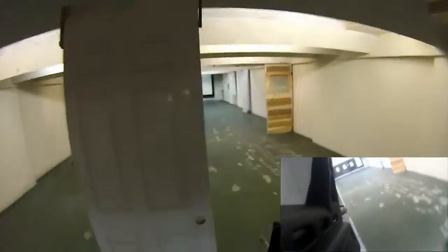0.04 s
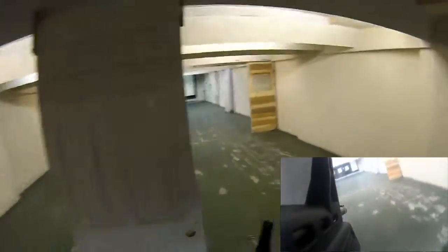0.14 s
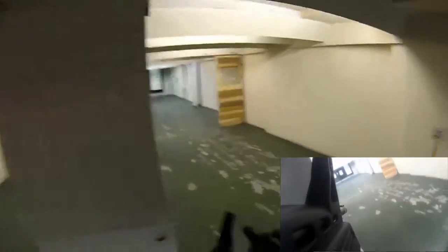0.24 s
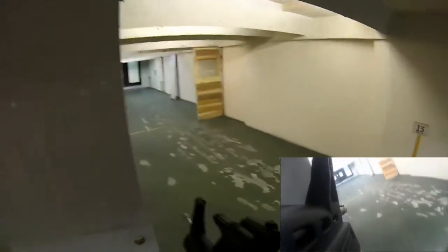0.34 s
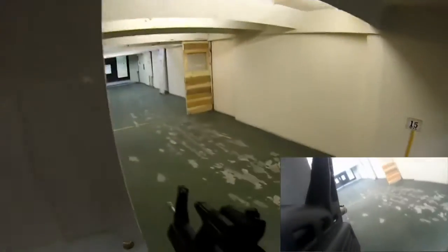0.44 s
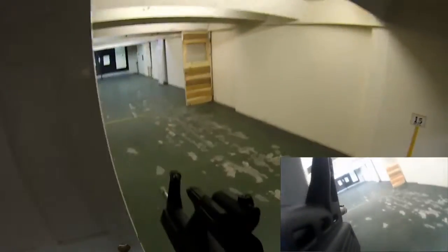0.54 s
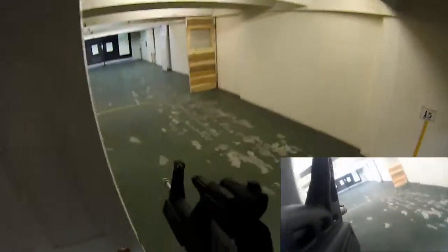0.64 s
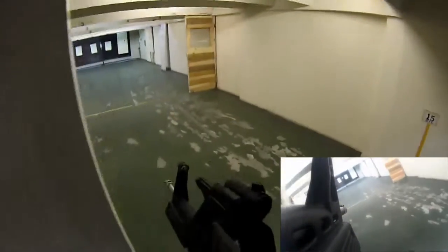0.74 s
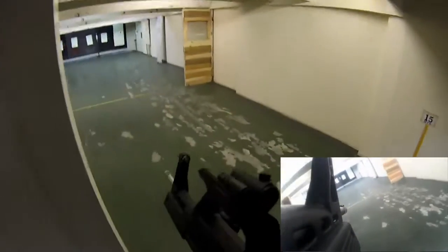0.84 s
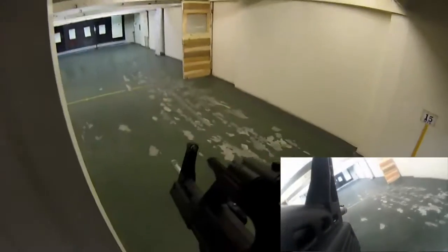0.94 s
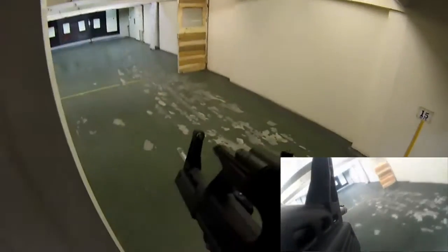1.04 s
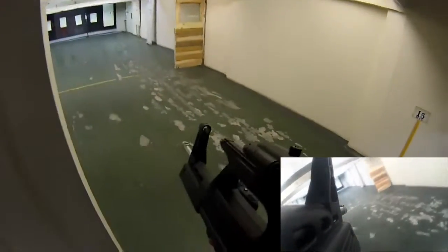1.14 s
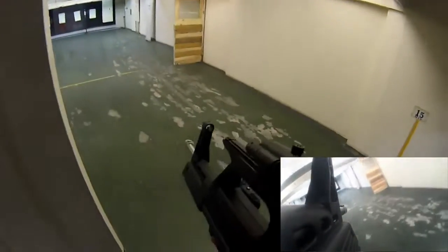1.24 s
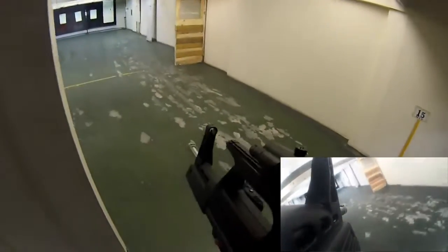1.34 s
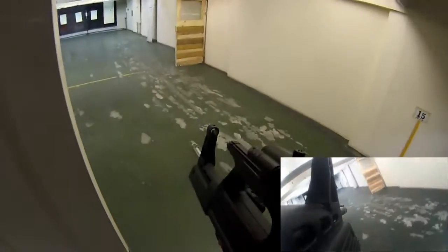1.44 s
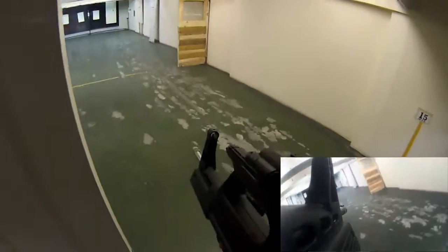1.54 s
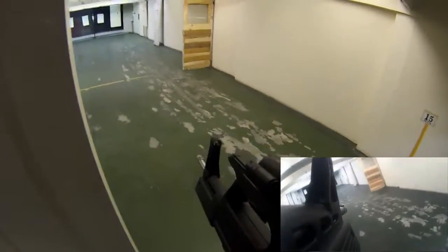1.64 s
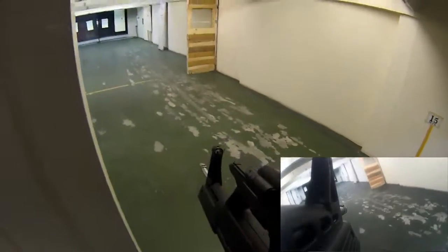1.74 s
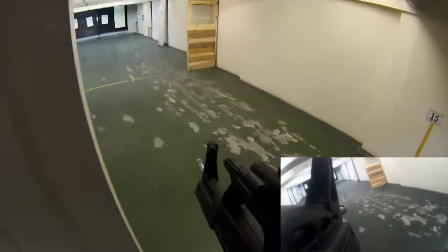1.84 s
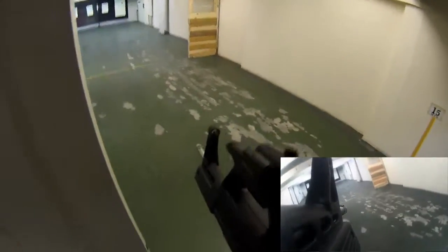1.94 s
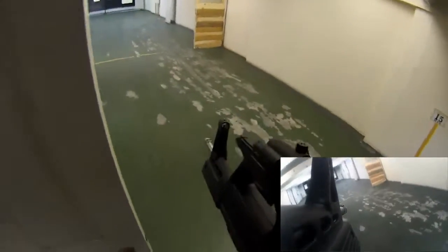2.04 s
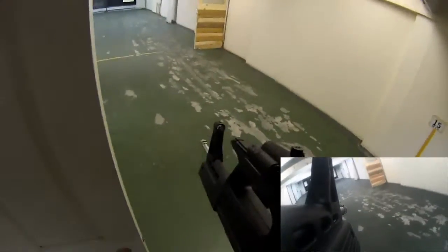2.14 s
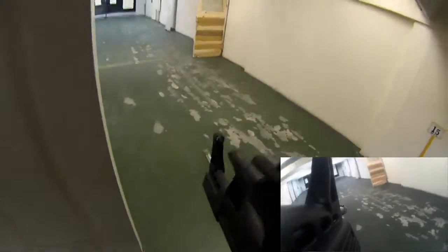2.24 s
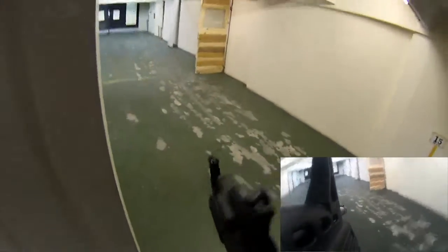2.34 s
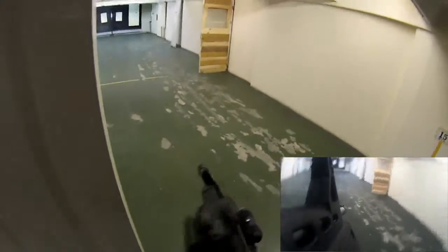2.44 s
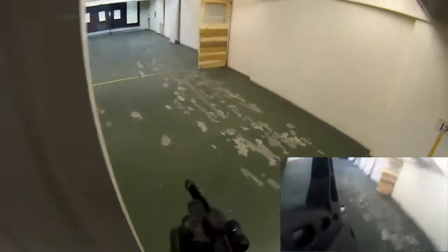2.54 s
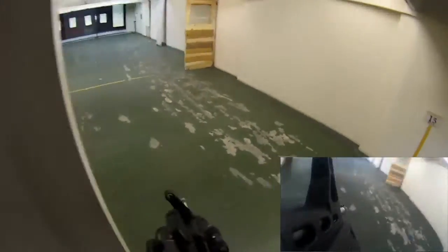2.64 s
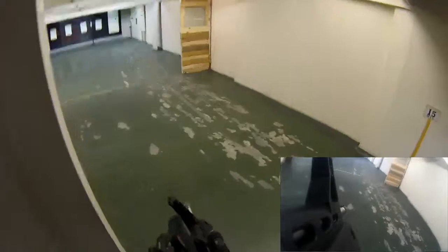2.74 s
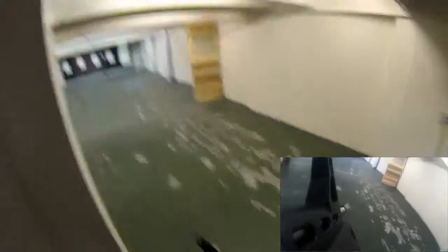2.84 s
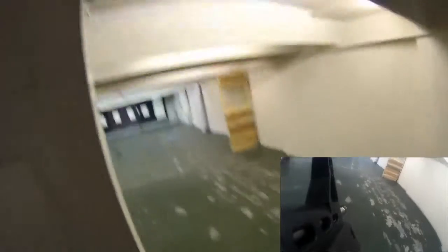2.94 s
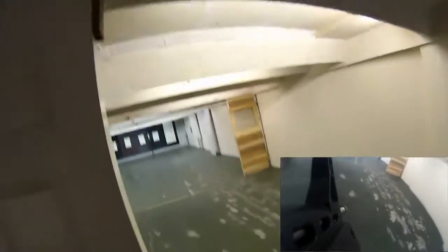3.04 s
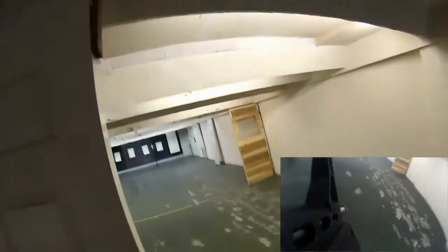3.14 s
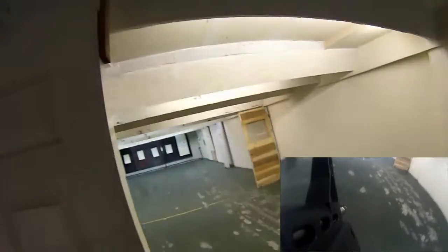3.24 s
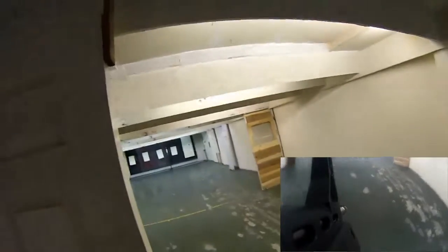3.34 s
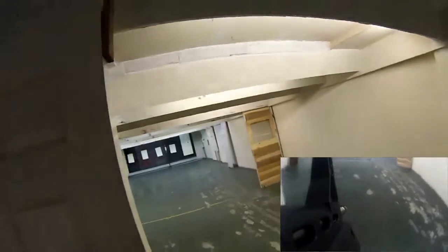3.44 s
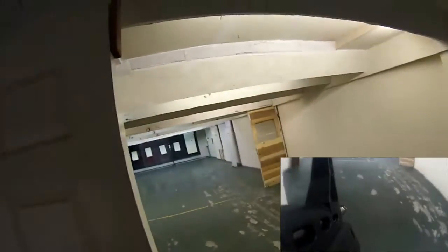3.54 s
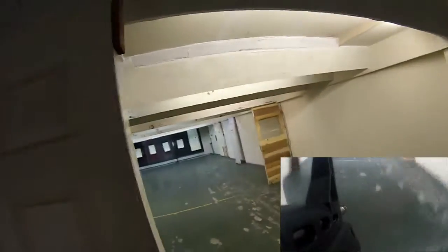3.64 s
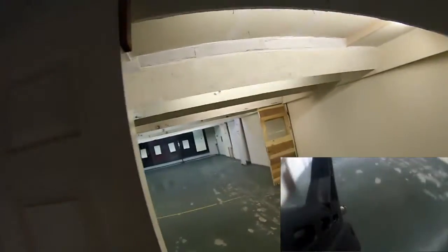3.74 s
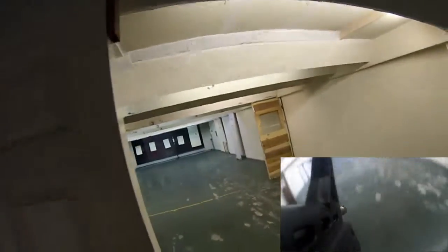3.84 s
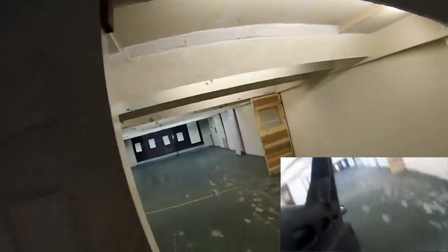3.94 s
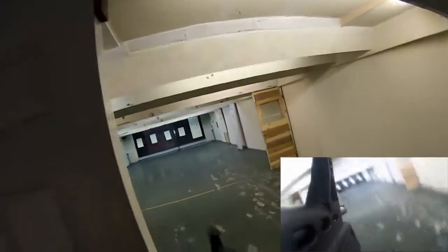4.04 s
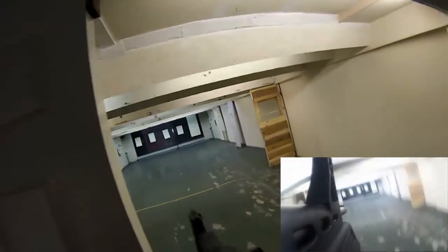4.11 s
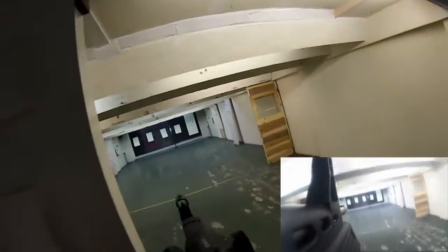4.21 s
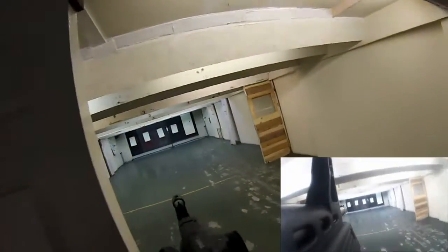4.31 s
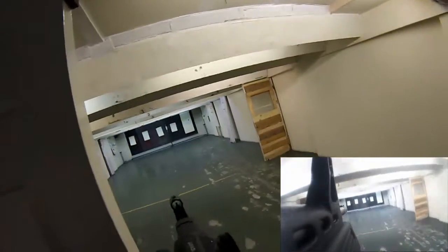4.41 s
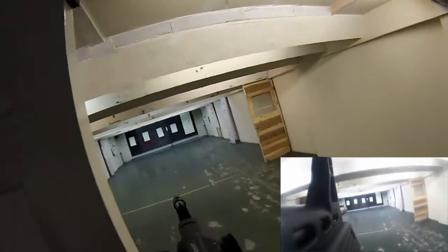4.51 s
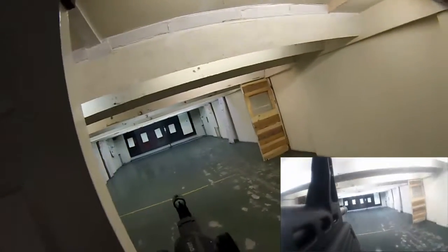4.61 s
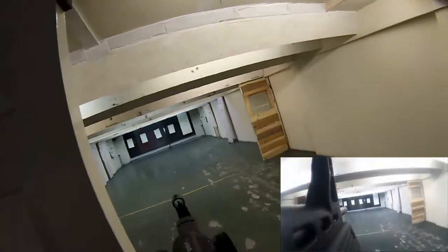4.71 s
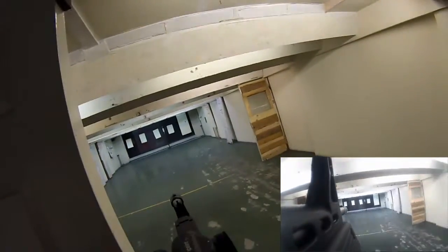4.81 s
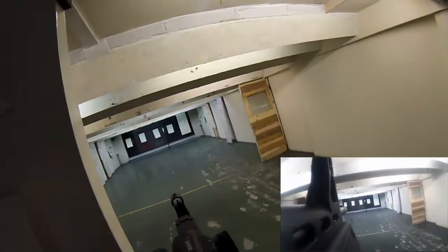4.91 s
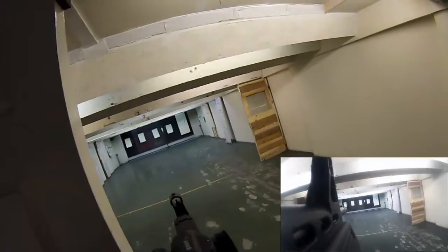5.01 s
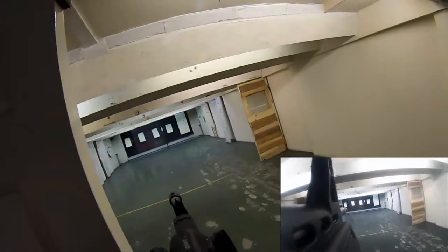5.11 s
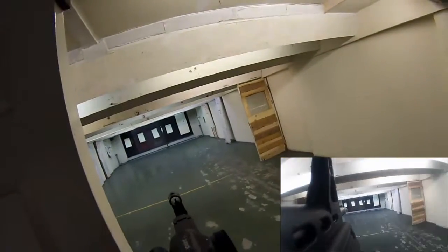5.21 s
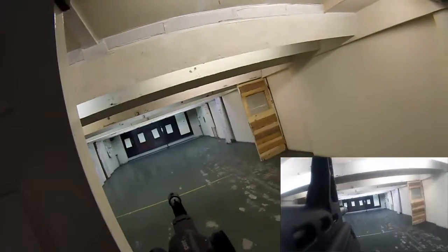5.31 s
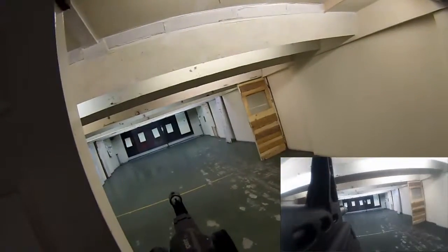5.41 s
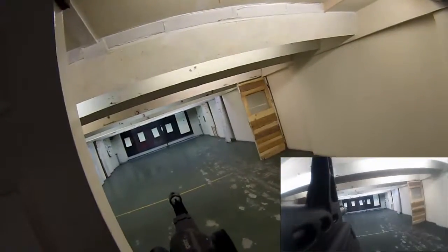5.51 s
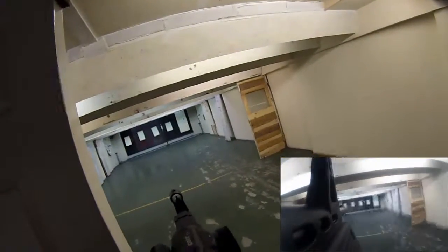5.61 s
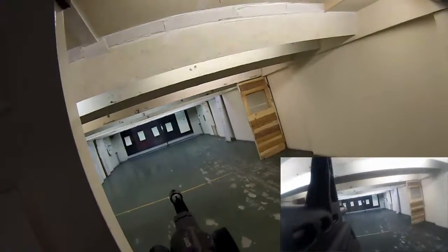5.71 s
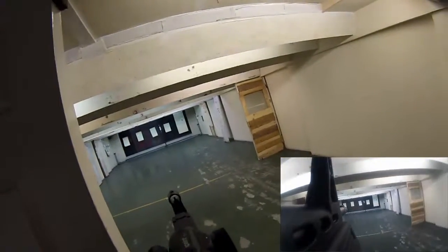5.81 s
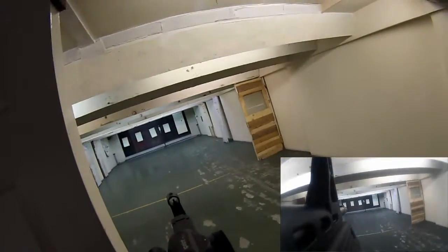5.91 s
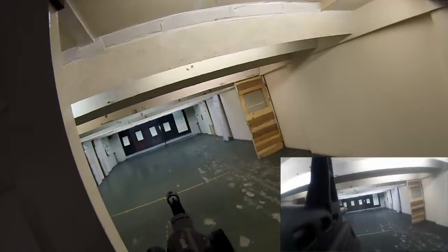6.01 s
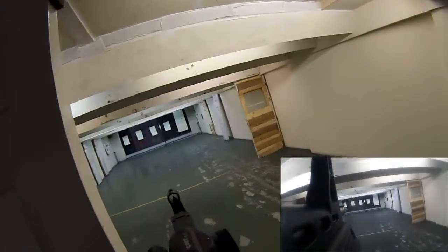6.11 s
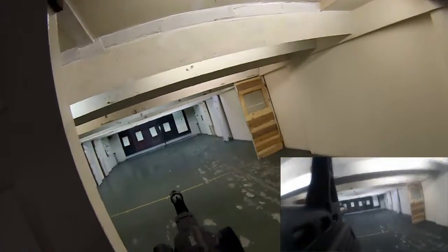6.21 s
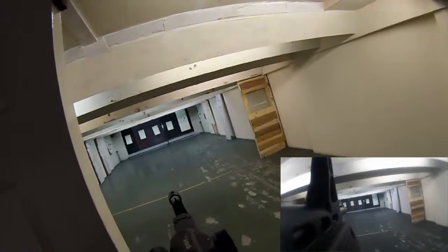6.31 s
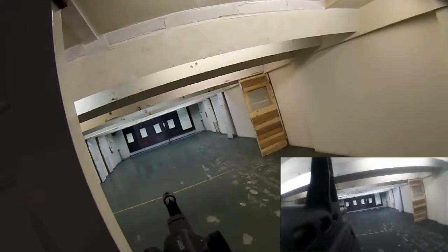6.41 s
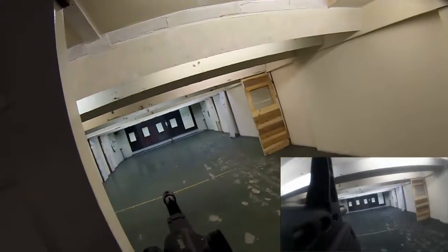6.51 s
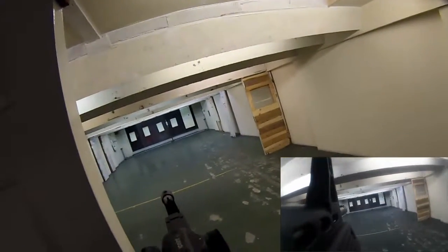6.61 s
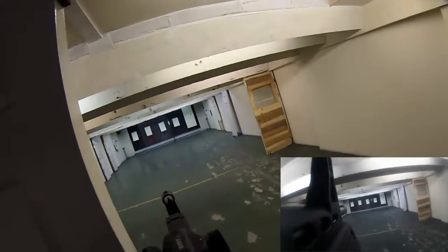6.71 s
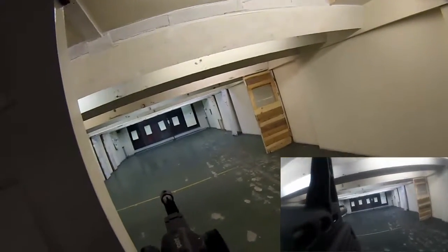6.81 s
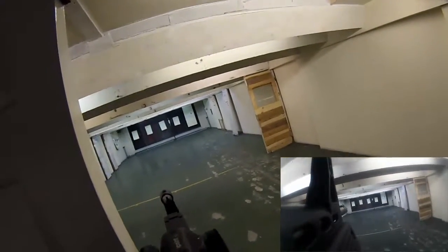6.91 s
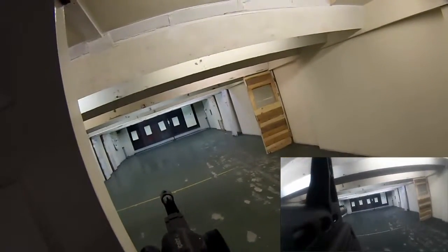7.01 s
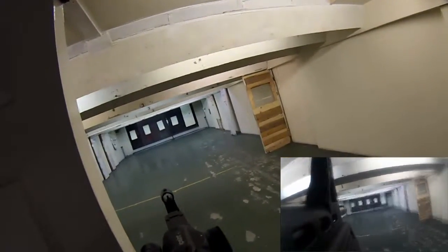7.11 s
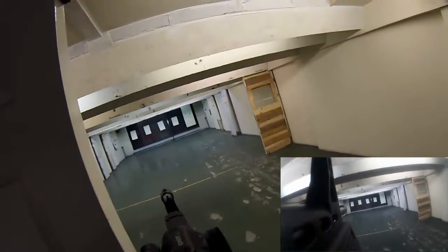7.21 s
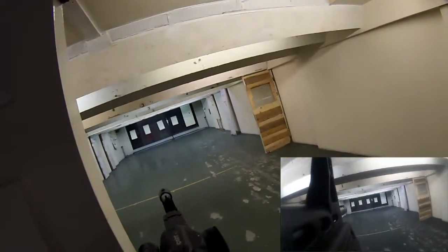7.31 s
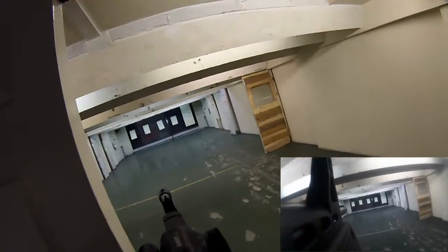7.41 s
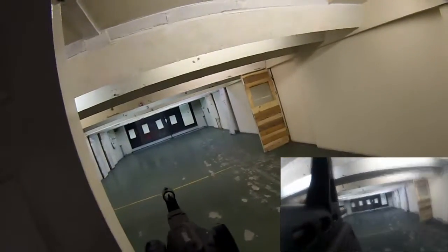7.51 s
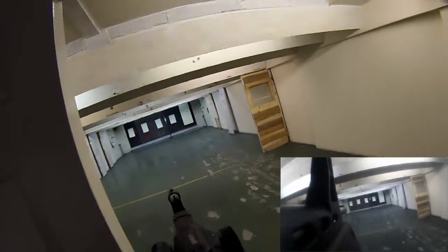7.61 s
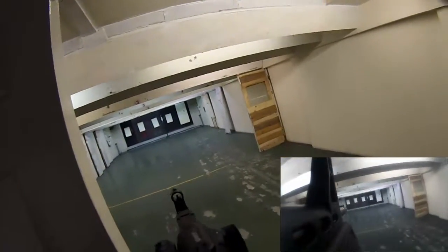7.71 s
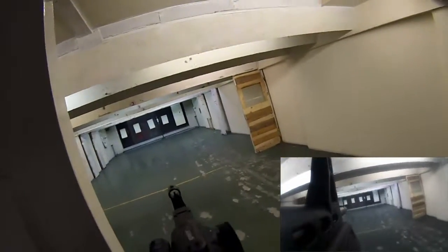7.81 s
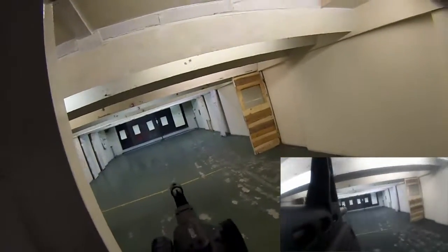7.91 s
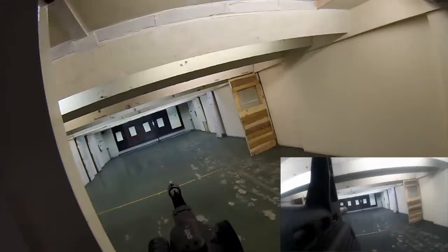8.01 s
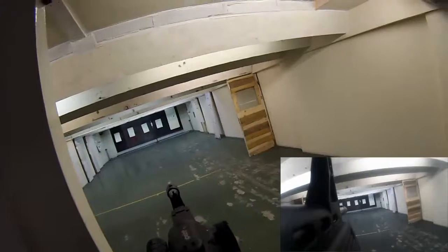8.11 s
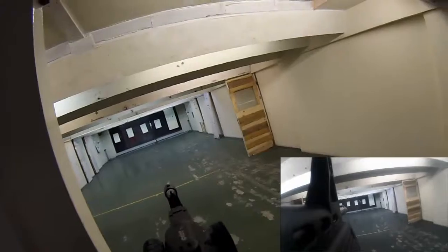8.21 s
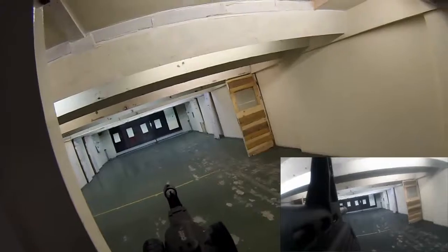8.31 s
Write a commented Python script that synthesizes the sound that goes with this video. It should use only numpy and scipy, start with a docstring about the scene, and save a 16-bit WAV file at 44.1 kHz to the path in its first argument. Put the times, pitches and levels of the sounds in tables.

```python
"""A rifle is handled, loaded and fired four times in a concrete indoor range, heard at a camera on the shooter.
From the start, filtered noise and a sine give steady ventilation, while grains and low noise give gear rustle.
Damped tones, noise contacts and random metal modes give knocks and clicks; at 3.7 s the bolt's steel modes ring.
The rustle dies away; from 5.65 s each blast is a set of shock arrivals, a far-wall slap and a diffuse roar.
Throughout, a gain control holds down loud passages; cracks that remain too strong are clipped."""
import sys
import numpy as np
from scipy import signal
from scipy.io import wavfile
from scipy.ndimage import uniform_filter1d

SR = 44100
rng = np.random.default_rng(int(sys.argv[2]) if len(sys.argv) > 2 else 0)


def materialize(psi):
    """Save the field psi as 16-bit PCM at rate SR to the path in sys.argv[1].

    A 1-D psi becomes a single channel; in a 2-D psi each row is a channel.
    """
    bounded = np.clip(np.atleast_2d(psi).T, -1, 1)
    quanta = np.round(bounded * 32767).astype(np.int16)
    wavfile.write(sys.argv[1], SR, quanta)


N = 368235
TIME = np.arange(N) / SR

# All levels in the tables are relative; the sources add their own offsets.
# Ventilation spectrum: f/Hz, density level/dB
AIR_SPECTRUM = [(15, -14), (28, -7), (65, -16.5), (100, -7.5), (150, -18.5), (200, -13.5), (270, -16.5),
                (400, -14.5), (480, -19), (720, -20), (1300, -23), (5000, -32), (14000, -41)]
# Effort of the shooter's movement, for rustle and rumble: t/s, level/dB
MOVEMENT_EFFORT = [(0.0, -46), (0.18, -48.5), (0.43, -53), (0.75, -46.5), (0.9, -57.5), (1.08, -53.5),
                   (1.29, -54), (1.72, -62), (1.94, -55), (2.11, -48.5), (2.21, -50.5), (2.33, -56),
                   (2.62, -61.5), (3.24, -59), (3.3, -54)]
# Jostles of the camera: t/s, level/dB
CAMERA_BUMPS = [(.02, -44.5), (.6, -50)]
# Knocks of rifle, magazine and sling: t/s, hollow knock level/dB, hollow pitch f/Hz,
# metal clack level/dB, bright tick level/dB, lead of the first light touch t/s
KNOCKS = [(0.201, -6.5, 740, -29, -35, .021), (0.258, -22, 930, -49, -62, 0.013),
          (0.334, -12, 663, -44, -45.5, 0.0011), (0.39, -28, 880, -46, -49.5, .001),
          (0.505, -24, 567, -62, -73, 0.00076), (0.69, -22, 560, -50.5, -61, 0.0023),
          (0.882, -29, 860, -46.5, -56.5, 0.0036), (0.963, -24.5, 900, -50.5, -55.5, 0.0024),
          (1.037, -32, 740, -56, -62, .002), (1.172, -25.5, 635, -42.5, -56, 0.0012),
          (1.288, -18, 574, -43, -50.5, 0.023), (1.635, -16, 647, -44, -51.5, 0.0011),
          (1.885, -27, 716, -52, -58, .004), (1.985, -15.5, 575, -42.5, -52, 0.02),
          (2.108, -18, 520, -47.5, -49.5, 0.015), (2.125, -22, 594, -46, -53, 0.0029),
          (2.2243, -13, 800, -28, -32, 0.0088), (2.272, -15.5, 634, -37.5, -42, .004),
          (2.5608, -12, 620, -28, -30.5, .001), (2.572, -14.5, 1020, -27.5, -30, .004),
          (2.883, -24.5, 950, -54, -57, 0.0019), (3.129, -23, 840, -49, -60, .007),
          (3.362, -10.5, 935, -24, -33, 0.0013), (3.393, 2, 930, -15.5, -23, 0.0029),
          (3.6984, 1.5, 920, -13, -12.5, .005), (4.609, -33, 905, -54.5, -68, 0.00096),
          (4.648, -42.5, 692, -76, -71, .002), (4.7, -42.5, 870, -66, -70, .002),
          (4.816, -44, 620, -69, -76, .002), (5.39, -42, 894, -63, -74, 0.0013),
          (5.501, -36.5, 900, -73, -77, 0.00082), (5.643, -18.5, 940, -46, -46, 0.031)]
# Spectrum of the hollow knock: f/Hz, density level/dB
HOLLOW_SPECTRUM = [(100, -40), (330, -21.5), (430, -8.5), (520, 0), (650, 1), (780, -5), (950, -0.5),
                   (1300, -12), (2500, -41.5), (6000, -75.5)]
# Spectrum of the metal clack: f/Hz, density level/dB
CLACK_SPECTRUM = [(400, -27), (1400, -5.5), (1900, 5), (2400, 4), (3100, 0.5), (3600, 2), (4600, -10),
                  (7000, -31.5), (14000, -50.5)]
# Spectrum of the bright tick: f/Hz, density level/dB
TICK_SPECTRUM = [(1000, -49.5), (3500, -7), (5000, 3.5), (7000, 3), (9500, -8), (14000, -13.5)]
# Reverberation of the hall, before any shortening: f/Hz, 60 dB decay time t/s
HALL_DECAY = [(60, 0.69), (250, 0.92), (800, 1.48), (2000, 1.37), (4000, 1.317), (8000, 0.96), (14000, 1.1)]
# Spectrum of the hall's answer to a hollow knock: f/Hz, density level/dB
KNOCK_ECHO_SPECTRUM = [(100, -35.5), (350, -28), (520, -8), (650, -3.5), (780, -1), (940, -0.5),
                       (1200, -10.5), (2500, -19.5), (6000, -66)]
# Spectrum of the hall's answer to a metal clack: f/Hz, density level/dB
CLACK_ECHO_SPECTRUM = [(500, -19), (1400, -11.5), (2200, 1), (3100, -2.5), (4600, -0.5), (5500, -2),
                       (7000, -11.5), (14000, -49)]
# The bolt slams home, a single row: t/s, level/dB
BOLT_SLAM = (3.6995, 11)
# Steel modes of the bolt: f/Hz, bandwidth f/Hz, energy level/dB
STEEL_MODES = [(2150, 81, -11), (2570, 100, -14), (3440, 131.4, -11.5), (4430, 58, 1.5), (5050, 130, -9.5),
               (5230, 240, 6.5), (6400, 220, -7.5)]
# Shots: t/s, blast level/dB, recoil thump level/dB
SHOTS = [(5.6507, -5, -20), (6.2206, -6, -22), (7.1482, -4, -9), (7.5300, -4.5, -14.5)]
# Blast paths, from the gun itself to the near walls: delay t/s, ring level/dB, ring f/Hz,
# shock front level/dB, spray level/dB, scatter time t/s, polarity of the front (sign)
BLAST_PATHS = [(-.0022, -17, 2520, -3, -11.5, 0.0022, 1), (-.0002, -1, 1010, -4.5, 9.5, 0.0006, 1),
               (.0037, 0, 3330, -19, -7.5, 0.0013, 1), (.0078, 10.5, 2127, 4.5, 5.5, 0.0018, -1),
               (0.0148, -9, 1120, -40, -13, 0.00078, 1), (0.0281, -4, 940, -52, -11.5, 0.011, -1)]
# Spectrum of the crack: f/Hz, density level/dB
CRACK_SPECTRUM = [(40, 0.5), (200, -2.5), (700, 2), (2000, -1.5), (3400, -2), (5000, -6), (6800, -7.5),
                  (8500, -17.5), (14000, -20)]
# Spectrum of the far wall's slap: f/Hz, density level/dB
SLAP_SPECTRUM = [(100, -19), (400, -12.5), (750, 8), (1200, -5.5), (2000, 3.5), (2700, -5.5), (4000, -17),
                 (14000, -32.5)]
# Spectrum of the roar that follows: f/Hz, density level/dB
ROAR_SPECTRUM = [(40, -22.5), (100, -14.5), (170, -13), (290, -12), (450, -7), (730, 0), (1050, -1.5),
                 (1350, -7), (1850, -0.5), (2300, -4), (2750, -11.5), (3250, -6), (3900, -15.5),
                 (5200, -15), (14000, -35.5)]

AIR_DB = -62  # rms level of the air noise
RUN_UP_S = 0.035  # time given to the touch and slide before each knock
# A heavier blow rings longer: rise time doubles with every RING_DOUBLING_DB above the usual knock.
USUAL_KNOCK_DB, RING_DOUBLING_DB = -20, 41.5
BLAST_RING_S = 0.0005  # rise time
EDGE_HZ = 14250  # upper band limit


def amp(db):
    """Level definition: an amplitude ratio is 10 to the power dB/20."""
    return 10 ** (np.asarray(db) / 20)


def evened(x):
    """Normalization: division by the root mean square gives unit rms."""
    return x / np.sqrt(np.mean(x ** 2) + 1e-20)


def read(points, hz):
    """Interpolation on a logarithmic frequency axis."""
    f, value = np.transpose(points)
    return np.interp(np.log(hz + 1), np.log(f + 1), value)


def add(mix, s, sound):
    """Superposition: a sound is summed into the mix from time s."""
    part = mix[max(round(s * SR), 0):][:len(sound)]
    part += sound[:len(part)]


def colour(x, spectrum, size=4096):
    """Minimum-phase filtering: the log gain fixes the phase of a causal filter, here of unit energy."""
    hz = abs(np.fft.fftfreq(size, 1 / SR))
    log_gain = np.log(amp(read(spectrum, hz)))
    response = np.exp(np.conj(signal.hilbert(log_gain)))
    taps = np.fft.ifft(response).real[:size // 2]
    return signal.oaconvolve(x, taps / np.linalg.norm(taps))[:len(x)]


def ring(hz, rise_s, size=4000):
    """Critically damped envelope: a tone swells to its peak at rise_s and dies."""
    t = TIME[:size]
    return np.sin(2 * np.pi * hz * t) * t / rise_s * np.exp(1 - t / rise_s)


def ventilation(hum_hz=100, hum_db=-73):
    """Stationary noise: steady coloured air flow with a faint sinusoidal mains hum."""
    air = evened(colour(rng.standard_normal(N), AIR_SPECTRUM))
    return amp(AIR_DB) * air + amp(hum_db) * np.sin(2 * np.pi * hum_hz * TIME)


def effort(s, settle_db_per_s=14):
    """Exponential decay: after its last row the level of movement falls steadily as the aim steadies."""
    at, db = np.transpose(MOVEMENT_EFFORT)
    return np.interp(s, at, db) - settle_db_per_s * np.maximum(s - at[-1], 0)


def movement(rustle_db=1.0, scrape_db=-12, rumble_db=-1, grains_per_s=1600, grain_db=-2.5,
             fits_db=3, fit_s=0.023):
    """Friction as random impulses: cloth and sling rub in fits of grains while the camera rumbles."""
    struck = rng.random(N) < grains_per_s / SR
    strength = amp(grain_db * np.minimum(rng.exponential(1, N), 3))
    fits = evened(uniform_filter1d(rng.standard_normal(N), int(fit_s * SR)))
    grains = struck * rng.standard_normal(N) * strength * amp(fits_db * fits)
    rustle = evened(colour(grains, HOLLOW_SPECTRUM))
    scrape = evened(colour(grains, CLACK_SPECTRUM) + colour(grains, TICK_SPECTRUM) / 2)
    # rumble spectrum: f/Hz, density level/dB
    low = [(15, -12.5), (50, -5), (100, -7.0), (200, -3), (400, 0.0), (2000, -61)]
    rumble = evened(colour(rng.standard_normal(N), low))
    return amp(effort(TIME)) * (amp(rustle_db) * rustle + amp(scrape_db) * scrape + amp(rumble_db) * rumble)


def bumps(hz=52, rise_s=0.025, size=12000):
    """Damped oscillation: each jostle of the camera gives a soft, deep throb."""
    out = np.zeros(N)
    for s, db in CAMERA_BUMPS:
        add(out, s, amp(db) * ring(hz, rise_s, size=size))
    return out


def hall(build_s, flutter_db, shorter=1, size=70000):
    """Diffuse reverberation: echo density builds up in clusters and each band decays at its own rate."""
    hz, t, z = signal.stft(rng.standard_normal(size), SR, nperseg=256)
    clusters = evened(uniform_filter1d(rng.standard_normal(len(t)), size=3))
    decay_s = shorter * read(HALL_DECAY, hz)[:, None]
    z = z * amp(flutter_db * clusters - 60 * t / decay_s)
    tail = signal.istft(z, SR, nperseg=256)[1][:size]
    tail = tail * (1 - np.exp(-TIME[:size] / build_s))
    return tail / np.linalg.norm(tail)


def near_hall(early_db=6, early_s=0.035, build_s=0.0063, flutter_db=1.3, shorter=0.7):
    """Early reflection: near walls strengthen the first echoes of small sounds at the shooter."""
    tail = hall(build_s, flutter_db, shorter)
    tail = tail * (1 + amp(early_db) * np.exp(-TIME[:len(tail)] / early_s))
    return tail / np.linalg.norm(tail)


def rattles(level_db=-33, spread_db=2, low_hz=560, high_hz=820, metal_db=-60, tick_db=-62,
            lead_s=0.003, count=10):
    """Random excitation: loose gear taps faintly, once in each equal interval; rows as in KNOCKS."""
    when, strength, pitch = rng.random((count, 3)).T
    s = (np.arange(count) + when) / count * MOVEMENT_EFFORT[-1][0]
    db = spread_db * (2 * strength - 1)
    hz = low_hz + (high_hz - low_hz) * pitch
    return list(zip(s, db + level_db, hz, db + metal_db, db + tick_db, np.full(count, lead_s)))


def pitched(spectrum, hz, usual_hz=760, follow=0.26):
    """Spectral scaling: a knock's colour shifts part of the way with its pitch."""
    return [(f * (hz / usual_hz) ** follow, db) for f, db in spectrum]


def contact(decay_s, lead_s, touch_db, slide_db, slide_s, rise_s, size=7000):
    """Contact noise: rough parts touch lightly, slide, meet after RUN_UP_S and rattle out."""
    t = TIME[:size] - RUN_UP_S
    touch, meet = [(1 - np.exp(-after / rise_s)) * np.exp(-after / decay_s)
                   for after in np.maximum([t + lead_s, t], 0)]
    slide = np.exp(-abs(t) / slide_s)
    return (amp(touch_db) * touch + amp(slide_db) * slide + meet) * rng.standard_normal(size)


def hollow_knock(db, hz, lead_s, ring_s=0.0014, ring_db=-4, lag_s=0.00093, touch_db=-12,
                 bounce_s=0.004444, bounce_db=-5, bounce_pitch=1.08, body_s=0.011, body_db=-10, size=7000):
    """Impact resonance: the rifle's hollow body is touched, struck, and struck again by the bounce."""
    tones = np.zeros(size)
    rise_s = ring_s * 2 ** ((db - USUAL_KNOCK_DB) / RING_DOUBLING_DB)
    add(tones, RUN_UP_S - lead_s, amp(touch_db) * ring(hz, ring_s))
    add(tones, RUN_UP_S + lag_s, ring(hz, rise_s))
    add(tones, RUN_UP_S + lag_s + bounce_s, amp(bounce_db) * ring(hz * bounce_pitch, rise_s))
    grit = contact(body_s, lead_s, touch_db=-11, slide_db=-12, slide_s=0.012, rise_s=0.00045, size=size)
    body = colour(grit, pitched(HOLLOW_SPECTRUM, hz))
    return amp(db) * (amp(ring_db) * tones + amp(body_db) * body)


def metal(count=24, size=1500, ring_db=-8, width_hz=200):
    """Modal superposition: a click plus many short, weak, random modes of other small parts."""
    t = TIME[:size]
    hz = np.exp(rng.uniform(np.log(1700), np.log(9000), (count, 1)))
    tones = np.sin(2 * np.pi * (hz * t + rng.random((count, 1))))
    modes = (tones * np.exp(-np.pi * width_hz * t)).sum(0)
    response = signal.unit_impulse(size) + amp(ring_db) * modes / np.linalg.norm(modes)
    return response / np.linalg.norm(response)


def metal_snap(metal_db, bright_db, lead_s, clack_s=0.0029, clack_db=8, tick_s=0.0038, tick_db=5):
    """Impulse response: the clack and bright tick of steel on steel set small parts ringing."""
    clack = contact(clack_s, lead_s, touch_db=-16.5, slide_db=-20, slide_s=0.01, rise_s=0.00017)
    tick = contact(tick_s, lead_s, touch_db=-19.5, slide_db=-22, slide_s=0.0065, rise_s=0.00024)
    clack = amp(metal_db + clack_db) * colour(clack, CLACK_SPECTRUM)
    tick = amp(bright_db + tick_db) * colour(tick, TICK_SPECTRUM)
    return signal.fftconvolve(clack + tick, metal())[:len(clack)]


def handling(hollow_wet_db=-13, metal_wet_db=-9, knock_wet_db=9, clack_wet_db=21, tick_wet_db=21, count=5):
    """Direct and reverberant sound: each contact's knock, clack and tick are answered by the hall."""
    out = np.zeros(N)
    tails = [near_hall() for _ in range(count)]  # used in turn: echoes change as the shooter moves
    answers = [[colour(tail, part) for part in (CLACK_ECHO_SPECTRUM, TICK_SPECTRUM)] for tail in tails]
    for k, (s, db, hz, metal_db, bright_db, lead_s) in enumerate(KNOCKS + rattles()):
        tail = tails[k % count]
        clack_echo, tick_echo = answers[k % count]
        knock = hollow_knock(db, hz, lead_s)
        snap = metal_snap(metal_db, bright_db, lead_s)
        add(out, s - RUN_UP_S, knock + snap)
        sent = amp(hollow_wet_db) * knock + amp(metal_wet_db) * snap
        add(out, s - RUN_UP_S, signal.fftconvolve(sent, tail))
        add(out, s, amp(db + knock_wet_db) * colour(tail, pitched(KNOCK_ECHO_SPECTRUM, hz)))
        add(out, s, amp(metal_db + clack_wet_db) * clack_echo)
        add(out, s, amp(bright_db + tick_wet_db) * tick_echo)
    return out


def bolt(size=4000):
    """Modal damping: steel modes die at pi times their bandwidth; the hall draws them into a shimmer."""
    out, t, steel = np.zeros(N), TIME[:size], np.zeros(size)
    for hz, width, db in STEEL_MODES:
        decay = np.sqrt(width) * np.exp(-np.pi * width * t)  # the root keeps energy independent of width
        steel += amp(db) * decay * np.sin(2 * np.pi * hz * t)
    tail = hall(build_s=0.005, flutter_db=-0.5, shorter=0.65)
    shimmer = signal.fftconvolve(steel / np.linalg.norm(steel), tail)
    s, db = BOLT_SLAM
    add(out, s, amp(db) * shimmer)
    return out


def arrival(ring_db, ring_hz, front_db, spray_db, scatter_s, polarity, blast_s=0.0006, size=4000):
    """Blast wave: a pressure jump swings below zero, with a short ring and spray from rough surfaces."""
    t = TIME[:size]
    front = np.sign(polarity) * (1 - t / blast_s) * np.exp(-t / blast_s)
    front = front / np.linalg.norm(front)
    spray = rng.standard_normal(size) * np.exp(-t / scatter_s)
    crack = colour(amp(front_db) * front + amp(spray_db) * spray, CRACK_SPECTRUM)
    return crack + amp(ring_db) * ring(ring_hz, BLAST_RING_S)


def slap(width_s=0.0067, core_s=0.00025, core_db=5, size=3000):
    """Reflection with scattering: the far wall returns a strong core in a swell, centred in its array."""
    t = abs(TIME[:size] - TIME[size // 2])
    swell = np.exp(-t / width_s) + amp(core_db) * np.exp(-t / core_s)
    return colour(rng.standard_normal(size) * swell, SLAP_SPECTRUM)


def shots(crack_db=8, roar_db=31, alike=0.65, slap_s=0.09, slap_db=0,
          thump_hz=58, thump_s=0.0032, thump_delay_s=0.0045, thump_db=11):
    """Multipath propagation: each blast takes the same paths and fills the hall; recoil jolts the camera."""
    out, t = np.zeros(N), TIME[:SR // 4]
    arrivals = [(delay, arrival(*path)) for delay, *path in BLAST_PATHS]
    echo = slap()
    thump = -np.sin(2 * np.pi * thump_hz * t) * t / thump_s * np.exp(2 - 2 * t / thump_s)
    common, *own = [hall(build_s=0.00085, flutter_db=-0.2) for _ in range(len(SHOTS) + 1)]
    for (s, db, recoil_db), tail in zip(SHOTS, own):
        for delay, sound in arrivals:
            add(out, s + delay, amp(db + crack_db) * sound)
        add(out, s + slap_s - len(echo) / 2 / SR, amp(db + slap_db) * echo)
        # the shooter barely moves, so the tails share the fraction alike of their energy
        roar = np.sqrt(alike) * common + np.sqrt(1 - alike) * tail
        add(out, s, amp(db + roar_db) * colour(roar, ROAR_SPECTRUM))
        add(out, s + thump_delay_s, amp(recoil_db + thump_db) * thump)
    return out


def scene():
    """Linear superposition: all sources sum at the one microphone."""
    return (ventilation() + movement() + bumps() + handling() + bolt() + shots())[None]


def record(dry, threshold_db=-20, squeeze=0.59, window_s=0.021, recovery_db_per_s=150, ceiling=0.84):
    """Compression: gain follows the averaged excess in dB, so short cracks slip through and clip."""
    power = abs(uniform_filter1d(dry[0] ** 2, size=100))
    level_db = 10 * np.log10(power + 1e-12)
    over_db = uniform_filter1d(np.maximum(level_db - threshold_db, 0), int(window_s * SR))
    # a running maximum against a falling line limits the speed of recovery
    fall = TIME * recovery_db_per_s
    held_db = np.maximum.accumulate(over_db + fall) - fall
    clipped = np.clip(dry / amp(squeeze * held_db), -ceiling, ceiling)
    band_limit = signal.firwin(401, EDGE_HZ, window=("kaiser", 7), fs=SR)
    return signal.oaconvolve(clipped, band_limit[None], "same")


dry = scene()
out = record(dry)
materialize(out)
```